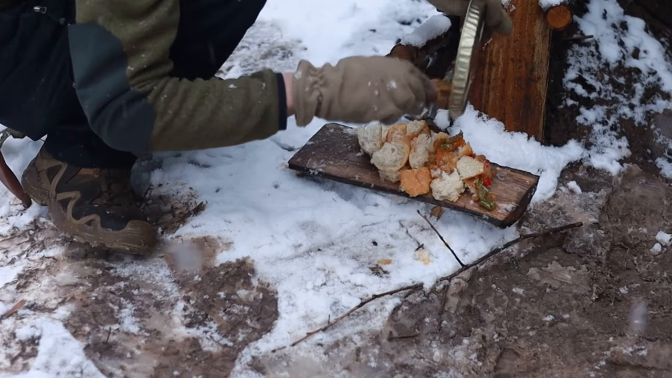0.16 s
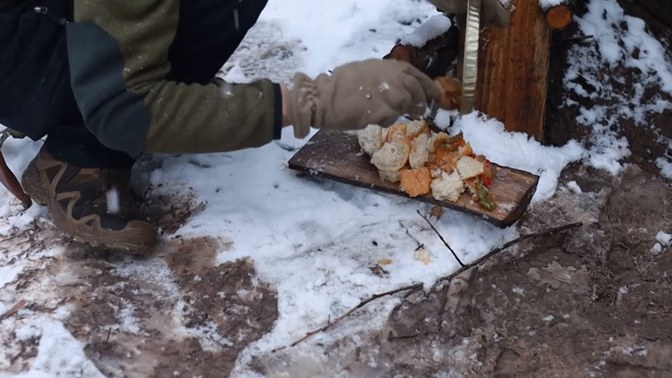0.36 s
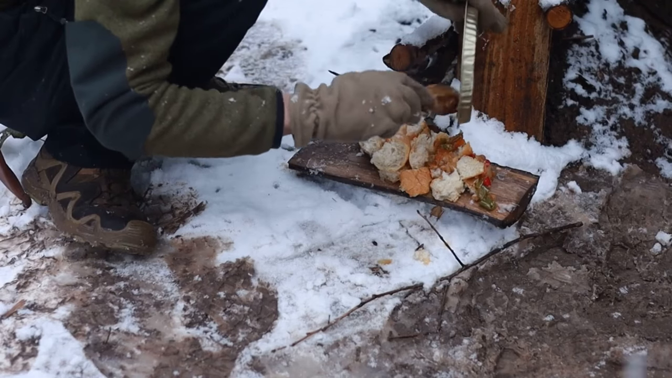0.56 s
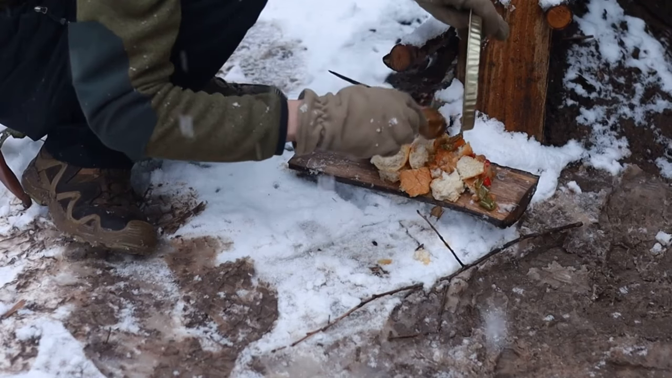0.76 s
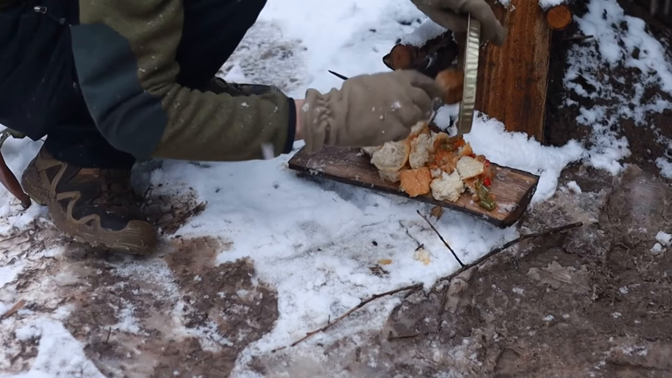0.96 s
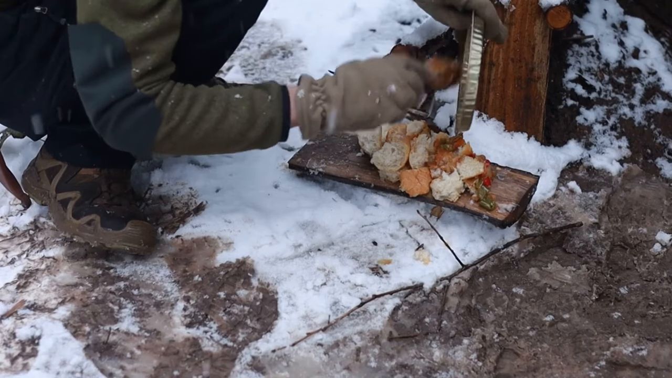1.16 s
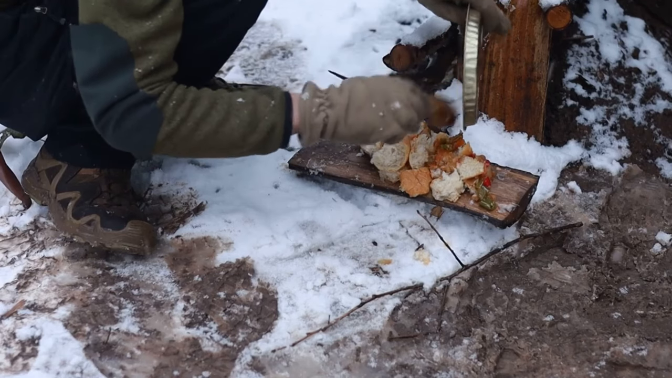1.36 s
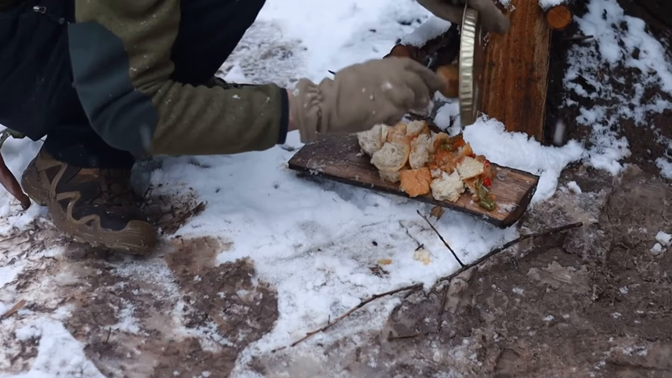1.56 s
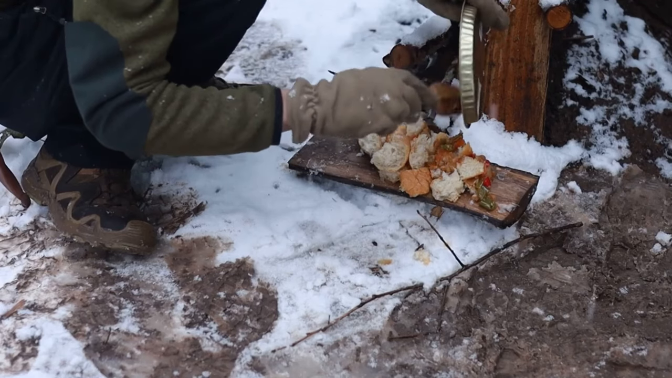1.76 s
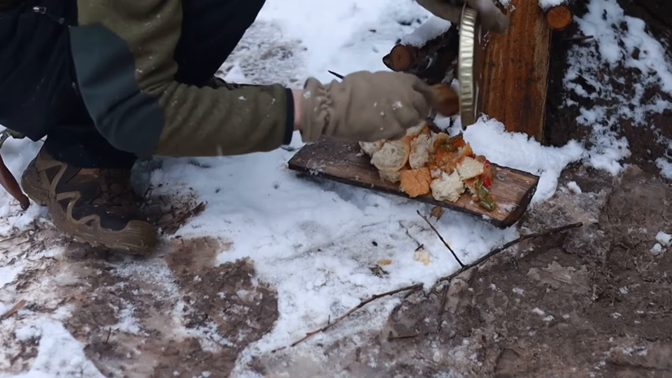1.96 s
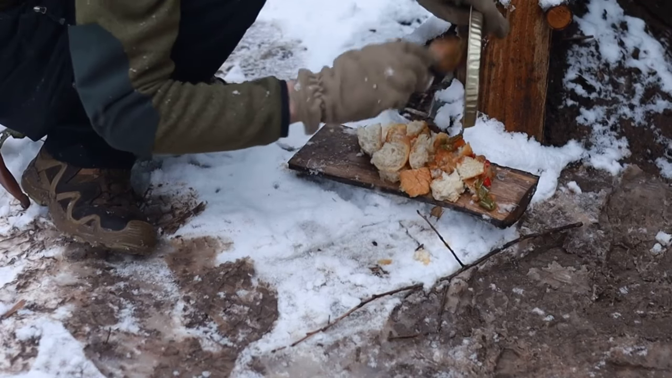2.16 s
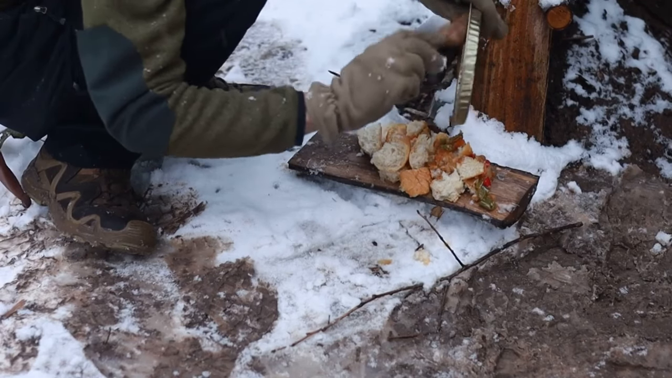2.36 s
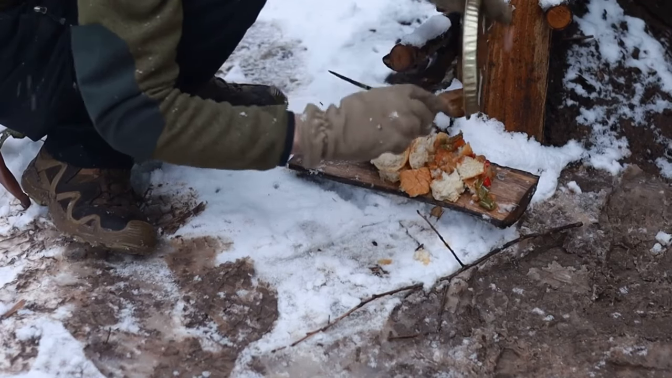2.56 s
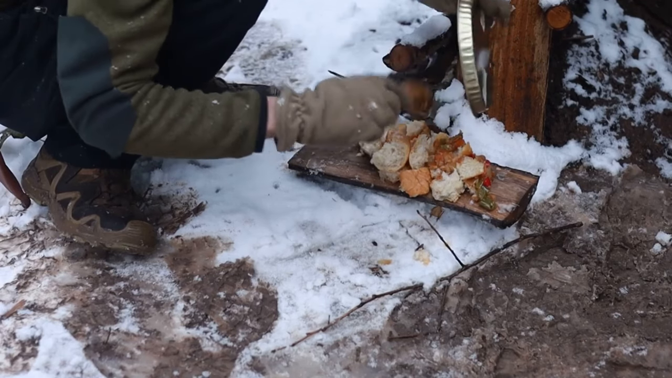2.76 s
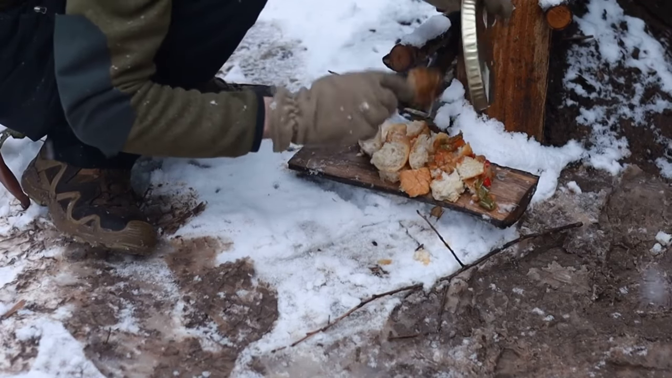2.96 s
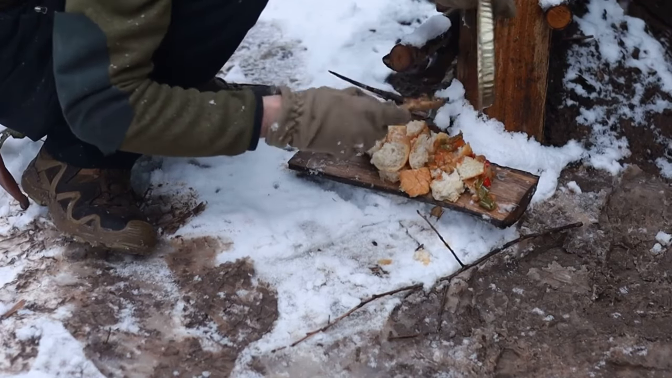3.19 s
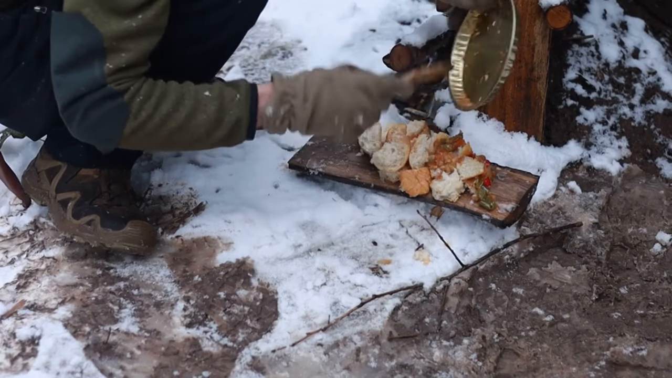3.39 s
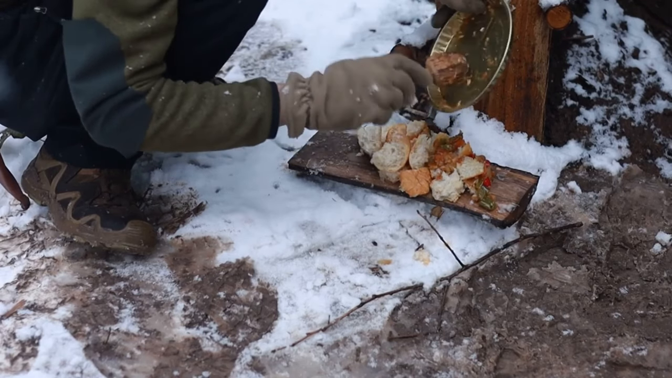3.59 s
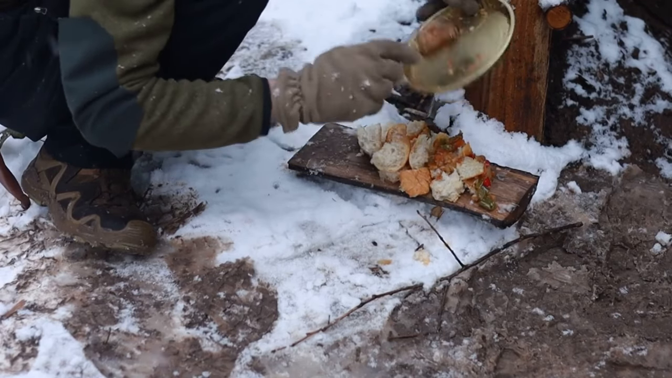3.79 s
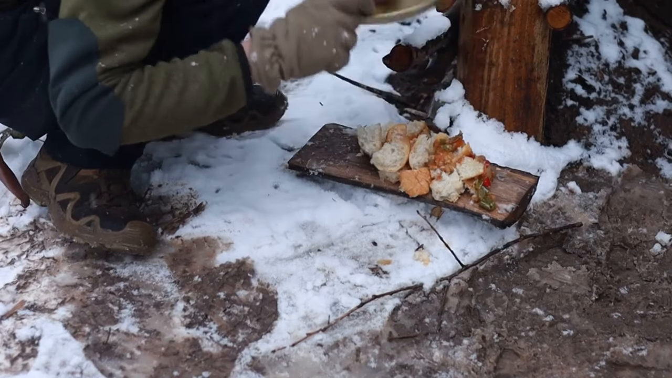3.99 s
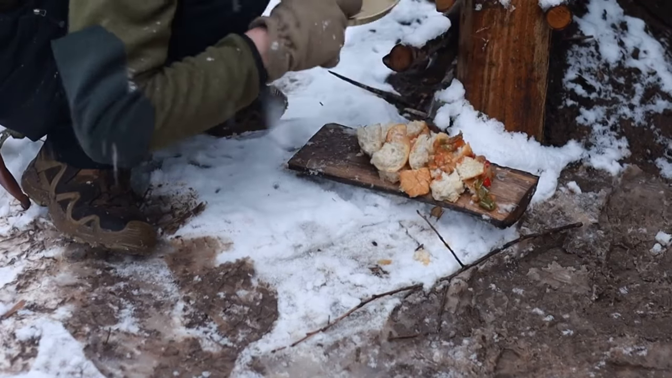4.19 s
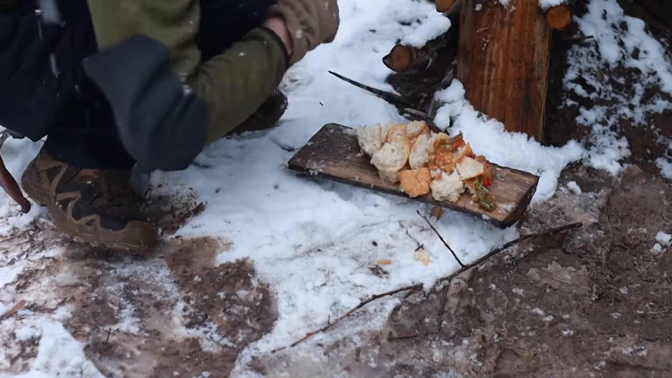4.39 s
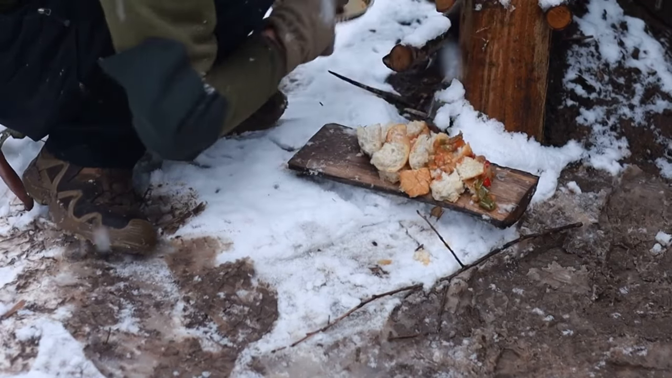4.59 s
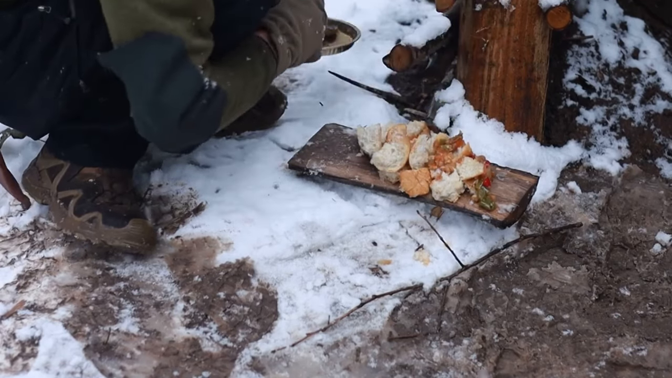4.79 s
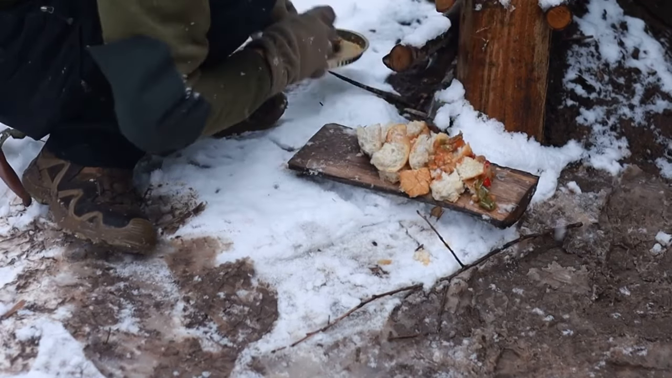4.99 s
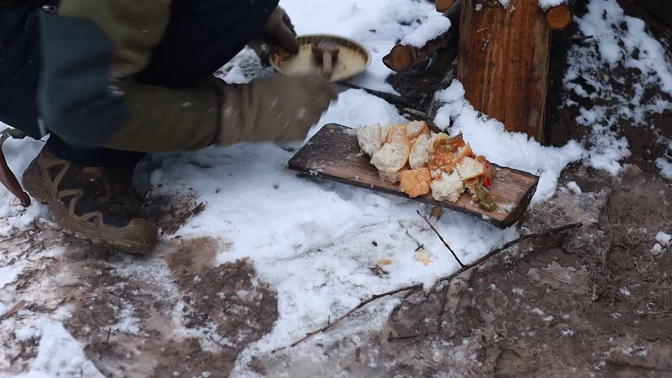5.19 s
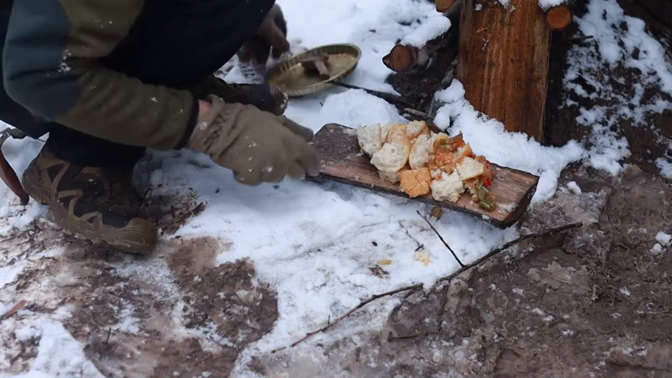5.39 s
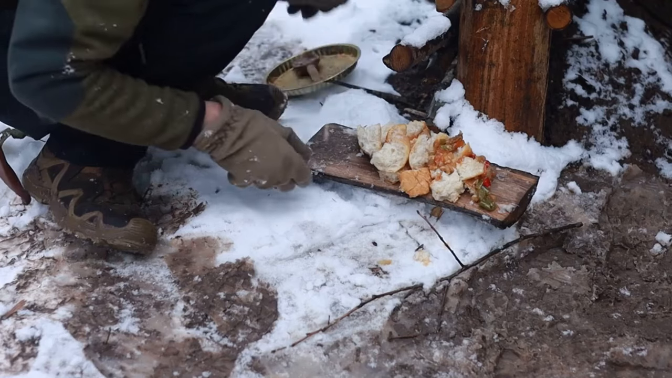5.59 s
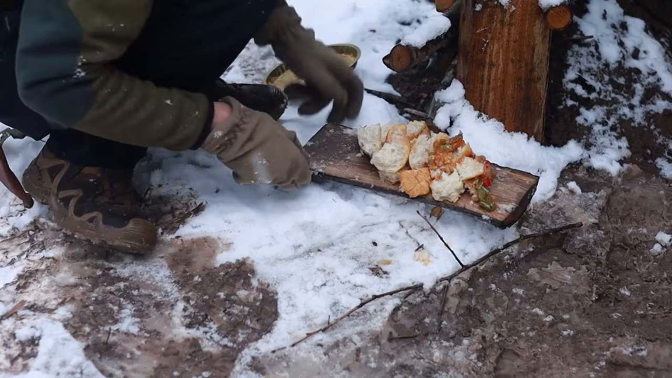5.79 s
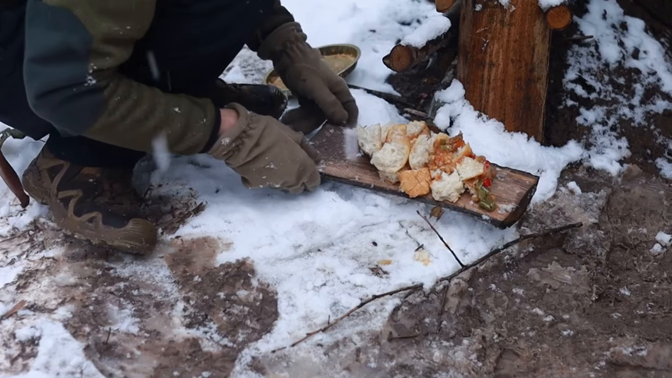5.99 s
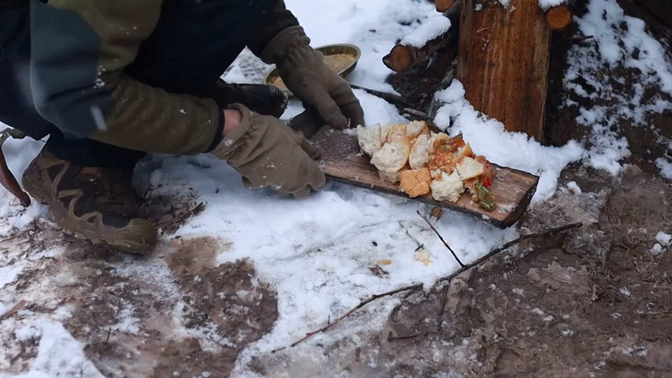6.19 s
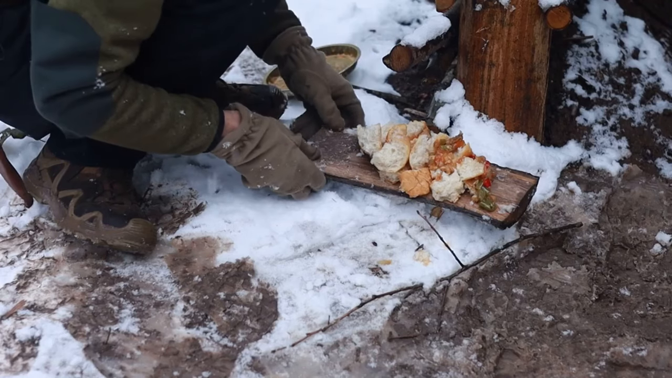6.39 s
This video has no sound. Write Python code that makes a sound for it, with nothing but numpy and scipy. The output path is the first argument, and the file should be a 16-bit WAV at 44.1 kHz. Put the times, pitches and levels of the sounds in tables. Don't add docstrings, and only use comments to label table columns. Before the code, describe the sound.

Near stereo microphone, quiet winter yard: uneven knife taps on a thin metal plate held in a glove, clinking with short dry rings, a rattling scrape among them. Later comes the loudest moment, a blade clattering into the loose plate and bouncing once. Afterwards a few blunt metal knocks, soft fabric slides, small cloth and snow ticks, and two dull pushes in snow at the end.

```python
import sys
import numpy as np
from scipy import signal
from scipy.fft import rfft, irfft, next_fast_len
from scipy.io import wavfile
from scipy.ndimage import uniform_filter1d, map_coordinates

SR = 44100
rng = np.random.default_rng(int(sys.argv[2]) if len(sys.argv) > 2 else 0)


def generate_wav(sig):
    pcm = np.round(np.clip(np.atleast_2d(sig).T, -1, 1) * 32767).astype(np.int16)
    wavfile.write(sys.argv[1], SR, pcm)


def how_loud(loudness_db):
    steps = np.asarray(loudness_db, float) / 20
    return 10 ** steps


N = 284445

# t/s, peak level/dB, edge level/dB, favoured f/Hz
TAPS = [
    (0.304, -20.5, -9, 2420),
    (0.542, -25.5, -6.5, 1090),
    (0.81, -25, -8, 2450),
    (1.157, -17.5, -5, 2320),
    (1.464, -21, -10.5, 1025),
    (1.774, -24, -7, 2350),
    (2.67, -25, -11.5, 2350),
]
# f/Hz of the mode left singing, rebound level re tap/dB
AFTER_TAPS = [(1130, -16), (867, -16), (851, -24), (1160, -11), (824, -4), (886, -10.5), (874, -5.5)]
# t/s, peak level/dB, edge level/dB, favoured f/Hz, looseness/0-1
TOUCHES = [(0.396, -35, -25, 655, 0.02), (0.61, -41, -11, 1120, 0.75), (0.765, -42.5, -15, 694, 0.66),
           (1.042, -43, -16, 1090, .95), (1.381, -40, -12, 736, 1), (1.4, -41.5, -49, 650, 0.5),
           (1.715, -36, 3, 1130, .4), (2.071, -39, -8, 2530, 1), (1.974, -36.5, -10, 1540, .55),
           (1.985, -39.5, -19, 764, 1), (2.582, -48.5, -9, 1340, .95), (2.693, -34.5, -13, 851, 0.5),
           (2.739, -41.5, -13, 1130, 0.5), (2.751, -42, -15, 651, 0.13)]
# start t/s, gap/s, first level/dB, last level/dB, favoured f/Hz
CHATTER = [
    (1.708, 0.0063, -37.5, -26, 1670),
    (2.038, .016, -43.5, -52, 2450),
]
# t/s, peak level/dB, edge level/dB, favoured f/Hz, looseness/0-1
DROPS = [
    (3.729, -11, -13, 549, 0.24),
    (3.735, -12, -7.5, 2400, 0.57),
    (3.745, -11.5, -16.5, 1770, 0),
    (3.753, -43, -10, 1670, 0.2),
]
# t/s, peak level/dB, edge level/dB, favoured f/Hz, looseness/0-1
LANDING = [
    (3.74, -17, -11, 1230, 0.79),
]
# t/s, peak level/dB, edge level/dB, favoured f/Hz, looseness/0-1
BOUNCE = [
    (3.876, -19.5, -6, 505, 0.7),
    (3.885, -21.5, -21, 860, 0.24),
    (3.9, -30, -37, 1688, 0.88),
    (3.907, -34.5, -21, 1640, 1),
]
# t/s, peak level/dB, edge level/dB, favoured f/Hz, looseness/0-1
KNOCKS = [
    (4.059, -46, -6, 694, 0.7),
    (4.142, -37.5, -12, 1270, 0.94),
    (4.633, -47, -28, 1690, 1),
    (4.799, -21, -14, 2010, 0.38),
    (4.818, -40, -13, 2180, 1),
    (5.201, -49, -32, 1670, 0.7),
    (5.305, -44, -10, 1706, 0.2),
]
# f/Hz, level/dB, t60/s
GRIPPED_MODES = [(183, -19, 0.18), (427, -20, 0.24), (651, -10.5, 0.17), (786, -9, 0.093),
                 (807.3, 5, 0.061), (1091.5, 2, 0.048), (1344, -6, 0.11), (1445, 8, 0.024),
                 (1622, -0.5, 0.066), (1690, 0.5, 0.069), (2303, 4.5, 0.042), (2450, 7, 0.036),
                 (2716, -4.5, 0.09), (2010, -6, 0.064)]
# f/Hz, level/dB, t60/s
LOOSE_MODES = [(467, -20, 0.18), (554, -20, 0.36), (654, -13, 0.22), (700, -20, 0.25), (935, -4.5, .15),
               (1122, -13, 0.2), (1188, 1, 0.038), (1400, -9, .12), (1700, 0.5, 0.12), (1950, -16, .12),
               (2090, -9.5, 0.13), (2350, -5.5, .11), (2800, -17, 0.073), (3262, -6, 0.097)]
# f/Hz, level/dB, t60/s
TIPPED_MODES = [(212, -17, 0.075), (549, 1, 0.06), (670, -23, 0.11), (942, 1, 0.1), (1090, -11, 0.19),
                (1470, -1.5, 0.11), (1688, -3, 0.074), (2360, -15, 0.098), (2660, -14, 0.036),
                (3265, -9, 0.053)]
# f/Hz, level/dB, t60/s
BLADE_MODES = [(3670, -6, 0.018), (4880, -8, 0.025), (5940, -29, 0.033), (6900, -17, 0.051),
               (6450, -9.5, 0.029), (12200, -22, 0.008), (8340, -12, 0.02)]
# f/Hz, density level/dB per Hz
SHEET_SPECTRUM = [(88, -63), (150, -30), (1210, -1), (1500, -13), (1720, -6), (3160, -8), (4670, -11),
                  (5790, -8.5), (9260, -15.5), (14800, -29), (16000, -26)]
# f/Hz, t60/s
SHEET_T60 = [(200, 0.13), (1000, 0.16), (3000, 0.075), (6000, 0.12), (12000, 0.014)]
# f/Hz, level/dB
LEAN_GRIPPED = [(60, -1.0), (110, -0.5), (200, -0.5), (380, -1.7), (700, -1.5), (1290, -2.5), (2380, -4),
                (4400, -2), (8120, 0.3), (15000, -2)]
# f/Hz, level/dB
LEAN_LOOSE = [(60, 0.0), (110, 0.68), (200, 0.28), (380, -0.11), (700, -0.7), (1290, -0.8), (2380, -2.1),
              (4400, -1.9), (8120, -1.2), (15000, -1.0)]
# f/Hz, level/dB
WIDTH = [(300, -23), (1000, -15), (3000, -12), (6000, -11), (10000, -15)]
# start t/s, swell/s, fade/s, peak level/dB
DRAGS = [
    (0.39, .01, 0.047, -49),
    (1.04, 0.007, .11, -62),
    (1.375, 0.013, 0.098, -59),
    (1.715, 0.062, 0.069, -35.5),
    (1.97, 0.01, 0.05, -46),
    (2.03, 0.011, 0.11, -41),
    (3.07, 0.014, .06, -47),
]
# start t/s, swell/s, fade/s, peak level/dB
GLOVES = [
    (4.42, 0.046, 0.14, -57),
    (4.55, 0.066, 0.054, -47.5),
    (5.1, 0.21, 0.11, -48),
]
# t/s, peak level/dB, centre f/Hz, length/s
BUMPS = [(0.394, -45, 673, 0.0052), (0.4, -42, 268, 0.0048), (1.046, -44, 780, 0.021),
         (1.387, -44, 770, 0.0088), (1.979, -45, 503, 0.007), (2.584, -52.5, 270, 0.022),
         (2.859, -53.5, 287, 0.0079), (3.075, -42, 610, 0.0066), (3.495, -43, 590, 0.0051),
         (4.142, -31.5, 830, 0.0021), (4.17, -48.5, 700, 0.01), (4.227, -44.5, 690, 0.011),
         (4.242, -49, 600, 0.016), (5.672, -48, 510, 0.0072)]
# f/Hz, t60/s
YARD_T60 = [(300, 0.054), (2000, 0.3), (8000, 0.13)]
# t/s, peak level/dB
TICKS = [(0.0944, -57), (0.1384, -51), (0.4484, -51), (0.4944, -57), (0.7133, -56), (2.4004, -59),
         (2.8614, -53), (2.8894, -55), (2.9744, -54), (3.0016, -52), (3.1484, -53), (3.3144, -53),
         (3.5416, -46), (3.9924, -56), (4.4464, -55), (4.4653, -56), (4.5126, -61), (4.595, -50),
         (5.1342, -52), (5.1554, -59), (5.2609, -50), (5.3894, -56), (5.442, -50), (5.5655, -44),
         (5.7803, -56), (5.9397, -51), (6.2064, -59), (6.2507, -53.5), (6.3224, -55)]
# t/s, peak level/dB, f/Hz
PUFFS = [
    (6.274, -47, 152.4),
    (6.371, -46, 183),
]
# t/s, level/dB
MOVING = [(0.0, -68), (0.2, -70), (0.49, -68.5), (0.81, -69.5), (3.56, -68), (3.99, -67.5), (4.15, -67.5),
          (5.06, -68), (5.39, -65), (5.66, -69), (6.45, -70.5)]
# f/Hz, level/dB per Hz
RUMBLE_SPECTRUM = [(12, -71), (20, -31.5), (82, -1), (228, -3.5), (290, -11.5), (325, -15), (600, -18.5),
                   (780, -52), (1320, -120)]
# f/Hz, level/dB per Hz
HISS_SPECTRUM = [(180, -11.5), (300, -3.5), (376, -8.5), (561, -6), (621, -5.5), (1670, -0.5), (2860, -4),
                 (3370, -5), (6000, -12.5), (7800, -36), (13200, -120)]
# f/Hz, level/dB per Hz
RUSTLE_SPECTRUM = [(2060, -60), (3500, -1), (4270, -1), (4470, -15), (7150, 3), (10200, -5.5),
                   (13100, -7.5), (15300, -9.5), (15900, -34)]
# f/Hz, correlation/-1..1
ALIKE = [(60, 0.93), (130, 0.99), (290, 0.84), (640, 0.62), (1410, 0.77), (3100, -0.16), (6820, -0.24),
         (15000, 0.31)]

BLOW_N = SR // 4
THUD_PER_DB = -0.78
TAP_LOOSE = 0.72
REBOUND_S, REBOUND_HZ, REBOUND_EDGE_DB, REBOUND_LOOSE = 0.009, 1656, -16, 0.72
SING_S, SING_DB, SING_EDGE_DB, SING_LOOSE = 0.00304, -9, -30, 0.89
SKIPS, SKIP_HZ, SKIP_EDGE_DB, SKIP_LOOSE = 5, 2630, -22.5, 0.88
TICK_HZ, TICK_S, TICK_DB = 5900, 0.0067, -3.5
RUMBLE_DB, HISS_DB, RUSTLE_DB = -65, -60, -70
HISS_FOLLOWS = 0.22
MONO_HZ, TOP_HZ = 6750, 16100
CEILING, KNEE = 0.42, 3.7


def unit(x):
    return x / np.sqrt(np.mean(x ** 2) + 1e-20)


def along(points, hz):
    f, v = np.transpose(points)
    return np.interp(np.log(hz + 1), np.log(f + 1), v)


def filtered(x, response):
    m = next_fast_len(x.shape[-1] + 4096)
    spectrum = rfft(x, m) * response(np.fft.rfftfreq(m, 1 / SR))
    return irfft(spectrum, m)[..., :x.shape[-1]]


def wobble(rate_hz):
    knots = rng.standard_normal(int(N * 40 / SR) + 4)
    return map_coordinates(knots, [np.arange(N) * min(rate_hz, 40) / SR])


def dying(t60s, stretch):
    hz, t, z = signal.stft(rng.standard_normal((2, BLOW_N)), SR, nperseg=128)
    t60 = stretch * along(t60s, hz)[:, None]
    return signal.istft(z * how_loud(-60 * t / t60), SR, nperseg=128)[1][:, :BLOW_N]


def plate(contacts, modes, lean, blunt_db, sheet_db, favour_db, ring_db, crack_db, crack_s, uneven_db):
    out = np.zeros((2, N + SR))
    t = np.arange(BLOW_N) / SR
    hz, level, t60 = np.transpose(modes)[..., None]
    for s, db, edge_db, favoured_hz, looseness in contacts:
        freedom = np.clip(looseness, 0.1, 1) / 0.6
        near_db = favour_db * np.exp(-(np.log(hz / favoured_hz) / 0.06) ** 2)
        scatter_db = uneven_db * rng.standard_normal(hz.shape)
        sign = np.sign(rng.standard_normal(hz.shape))
        jitter = rng.standard_normal((len(hz), len(t) // 63 + 1))
        waver = 0.018 / 8 * np.repeat(jitter, 63, axis=1)[:, :len(t)].cumsum(1)
        decay = how_loud(level + near_db + scatter_db - 60 * t / (freedom * t60))
        ring = (sign * decay * np.sin(2 * np.pi * hz * t + waver)).sum(0)

        near, across = shimmer(freedom, crack_db, crack_s)
        body = how_loud(ring_db) * ring / np.abs(ring).max() + how_loud(sheet_db) * near
        across = how_loud(sheet_db) * filtered(across, lambda f: how_loud(along(WIDTH, f)))
        pair = np.array([body + across, body - across])
        pair *= 1 - np.exp(-t / 0.00051)

        thud_db = blunt_db + THUD_PER_DB * (db + 39.5)
        tone = [(60, thud_db - 31), (170, thud_db + 28.5), (400, thud_db + 25), (700, 0.013),
                (2800, 0.03), (4200, edge_db + 10), (13000, 1.3 * edge_db + 8.5)]
        pair = filtered(pair, lambda f: how_loud(along(tone, f) + along(lean, f) / 2 * [[1], [-1]]))
        start = round((s + 0.0008) * SR)
        out[:, start:][:, :len(t)] += how_loud(db + 1.5) * pair / np.abs(pair).max()
    return out[:, :N]


def shimmer(stretch, crack_db, crack_s):
    sheet = filtered(dying(SHEET_T60, stretch), lambda f: how_loud(along([(2700, 5), (3300, 0)], f)))
    decay = how_loud(crack_db - 60 * np.arange(BLOW_N) / SR / crack_s)
    crack = decay * rng.standard_normal((2, BLOW_N))
    x = filtered(sheet + crack, lambda f: how_loud(along(SHEET_SPECTRUM, f)))
    return x / np.abs(x[0]).max()


def strokes():
    taps, light, singing = [], list(TOUCHES), []
    for (s, db, edge_db, hz), (sing_hz, rebound_db) in zip(TAPS, AFTER_TAPS):
        taps.append((s, db, edge_db, hz, TAP_LOOSE))
        light.append((s + REBOUND_S, db + rebound_db, REBOUND_EDGE_DB, REBOUND_HZ, REBOUND_LOOSE))
        singing.append((s + SING_S, db + SING_DB, SING_EDGE_DB, sing_hz, SING_LOOSE))
    for s, gap_s, first_db, last_db, hz in CHATTER:
        for k in range(SKIPS):
            db = first_db + (last_db - first_db) * k / (SKIPS - 1)
            light.append((s + k * gap_s, db, SKIP_EDGE_DB, SKIP_HZ if k == 2 else hz, SKIP_LOOSE))
    return taps, light, singing


def gripped_body(f):
    total = 0
    for k, (hz, db, t60) in enumerate(GRIPPED_MODES):
        damping = 1j * f * 7 / t60
        total = total + (-1) ** k * how_loud(0.58 * db) * damping / (hz * hz - f * f + damping)
    return total


def drag(rows, range_db, spiky, lumpy_db):
    t = np.arange(N) / SR
    level = np.zeros(N)
    for s, swell_s, fade_s, db in rows:
        times = [s - swell_s, s + swell_s, s + swell_s + 2 * fade_s]
        stroke = np.interp(t, times, [-2, 0, -2], -9, -9)
        level += how_loud(db - 10.5 + range_db * stroke)
    grit = rng.standard_normal(N)
    catches = grit * np.abs(grit) ** spiky * how_loud(lumpy_db * wobble(40))
    return level * unit(filtered(catches, gripped_body))


def bursts(rows, octaves, fall):
    out = np.zeros(N + SR)
    t = np.arange(SR // 12) / SR
    for s, db, hz, length_s in rows:
        burst = rng.standard_normal(len(t)) * (t / length_s) * np.exp(-t / length_s * fall)
        burst = filtered(burst, lambda f: np.exp(-(np.log2((f + 1) / hz) / octaves) ** 2))
        out[round(s * SR):][:len(t)] += how_loud(db) * burst / np.abs(burst).max()
    return out[:N]


def yard(x):
    tail = dying(YARD_T60, 0.48)
    delayed = np.pad(x, ((0, 0), (300, 0)))
    return signal.fftconvolve(delayed, tail / np.linalg.norm(tail[0]), axes=1)[:, :N]


def puffs():
    t = np.arange(N) / SR
    out = np.zeros(N)
    for s, db, hz in PUFFS:
        swell = np.exp(-((t - s - 0.012) / 0.0087) ** 2)
        out += how_loud(db - 10.5) * swell * np.sin(2 * np.pi * hz * t)
    return out


def rush(spectrum, patchy_db):
    z = signal.stft(rng.standard_normal((2, N)), nperseg=512)[2]
    field = uniform_filter1d(rng.standard_normal(z.shape[1:]), size=8, axis=0)
    field = uniform_filter1d(field, size=6, axis=1)
    pair = signal.istft(z * how_loud(patchy_db * unit(field)), nperseg=512)[1][:, :N]

    def mid_side(hz):
        turn = np.arccos(np.clip(along(ALIKE, hz), -1, 1)) / 2
        return how_loud(along(spectrum, hz)) * [np.cos(turn), np.sin(turn) * (hz < MONO_HZ)]

    mid, side = filtered(pair, mid_side)
    return unit(np.array([mid + side, mid - side]))


def air():
    s, level = np.transpose(MOVING)
    busy_db = np.interp(np.arange(N) / SR, s, level - level.mean())
    flutter = wobble(22)
    swell_db = 0.4 * wobble(15) + 0.9 * wobble(2.5)
    hiss_db = HISS_DB + HISS_FOLLOWS * busy_db + 0.9 * flutter
    rustle_db = RUSTLE_DB + busy_db + 0.67 * flutter + 1.2 * wobble(38)
    rumble = how_loud(RUMBLE_DB + swell_db) * rush(RUMBLE_SPECTRUM, patchy_db=3)
    hiss = how_loud(hiss_db) * rush(HISS_SPECTRUM, patchy_db=1.2)
    rustle = how_loud(rustle_db) * rush(RUSTLE_SPECTRUM, patchy_db=0.7)
    return rumble + hiss + rustle


def scene():
    struck = GRIPPED_MODES + [(hz, db + 15.5, t60) for hz, db, t60 in BLADE_MODES]
    taps, light, eased = strokes()
    metal = plate(taps, struck, LEAN_GRIPPED, blunt_db=-14.5, sheet_db=-1, favour_db=14,
                  ring_db=-3.5, crack_db=20.5, crack_s=0.021, uneven_db=5)
    metal += plate(light, GRIPPED_MODES, LEAN_GRIPPED, blunt_db=-11, sheet_db=1.5, favour_db=15,
                   ring_db=-3.5, crack_db=13.5, crack_s=0.022, uneven_db=5.5)
    metal += plate(eased, GRIPPED_MODES, LEAN_GRIPPED, blunt_db=-12, sheet_db=-27.5, favour_db=11.5,
                   ring_db=-13.5, crack_db=6, crack_s=0.014, uneven_db=2)
    metal += plate(LANDING, LOOSE_MODES, LEAN_LOOSE, blunt_db=-6, sheet_db=-6.5, favour_db=3,
                   ring_db=3, crack_db=6, crack_s=0.045, uneven_db=1.5)
    metal += plate(DROPS, LOOSE_MODES, LEAN_LOOSE, blunt_db=2.5, sheet_db=7.5, favour_db=19,
                   ring_db=-17, crack_db=3, crack_s=0.051, uneven_db=14)
    metal += plate(BOUNCE, TIPPED_MODES, LEAN_LOOSE, blunt_db=1, sheet_db=2.5, favour_db=17.5,
                   ring_db=-1.5, crack_db=20, crack_s=0.044, uneven_db=2.7)
    metal += plate(KNOCKS, GRIPPED_MODES, LEAN_GRIPPED, blunt_db=-14.5, sheet_db=6, favour_db=14,
                   ring_db=2, crack_db=16, crack_s=0.026, uneven_db=3)
    scrapes = drag(DRAGS, range_db=28.5, spiky=3.6, lumpy_db=4)
    scrapes += drag(GLOVES, range_db=15.5, spiky=1.3, lumpy_db=0)
    metal += scrapes * how_loud([[-0.8], [0.8]])
    metal += bursts(BUMPS, octaves=1.03, fall=1.5)
    tick_rows = [(s, db + TICK_DB, TICK_HZ, TICK_S) for s, db in TICKS]
    ticks = bursts(tick_rows, octaves=1.4, fall=2.2)
    return metal + how_loud(-15) * yard(metal) + ticks + puffs() + air()


def band_limit(x):
    return signal.sosfilt(signal.butter(12, 16460, fs=SR, output="sos"), x)


def record(dry):
    rounded = dry / (1 + np.abs(dry / CEILING) ** KNEE) ** (1 / KNEE)
    mix = filtered(rounded, lambda hz: hz < TOP_HZ)
    return band_limit(mix)


dry = scene()
out = record(dry)
generate_wav(out)
```